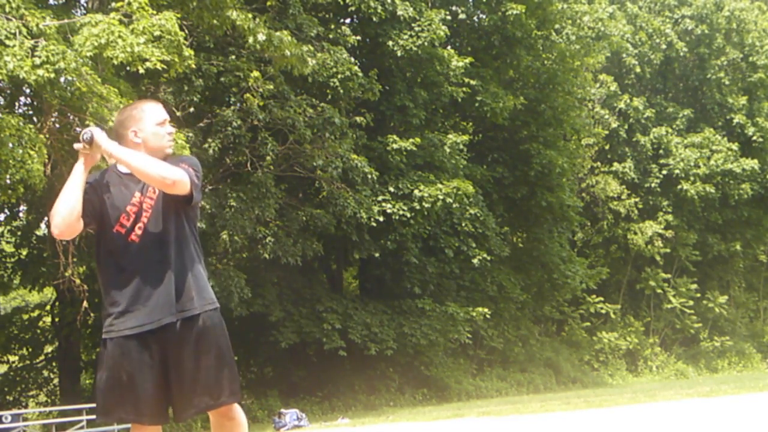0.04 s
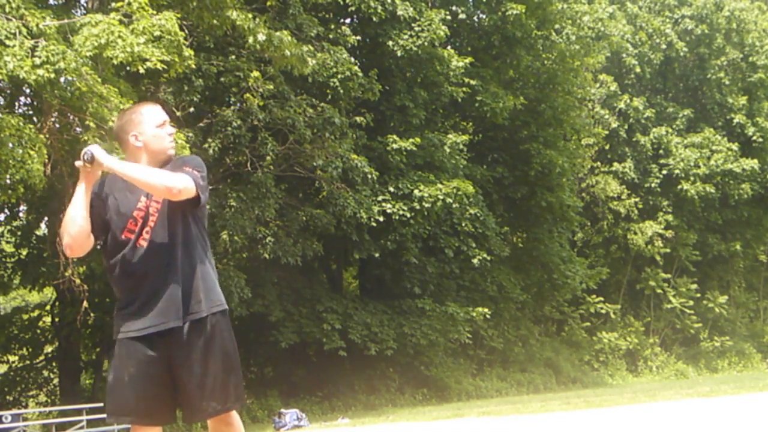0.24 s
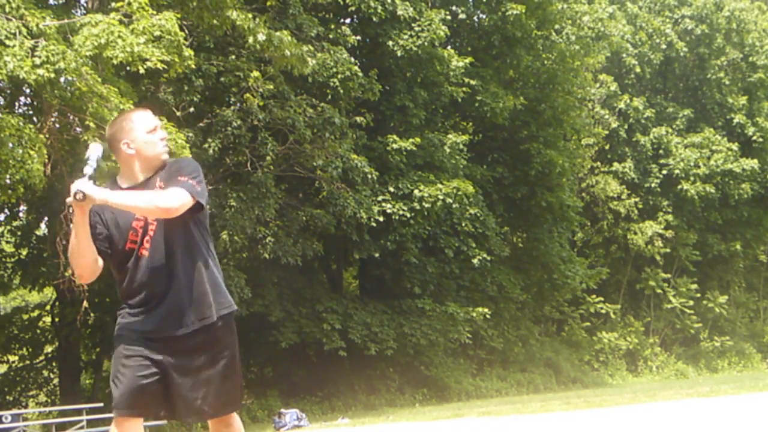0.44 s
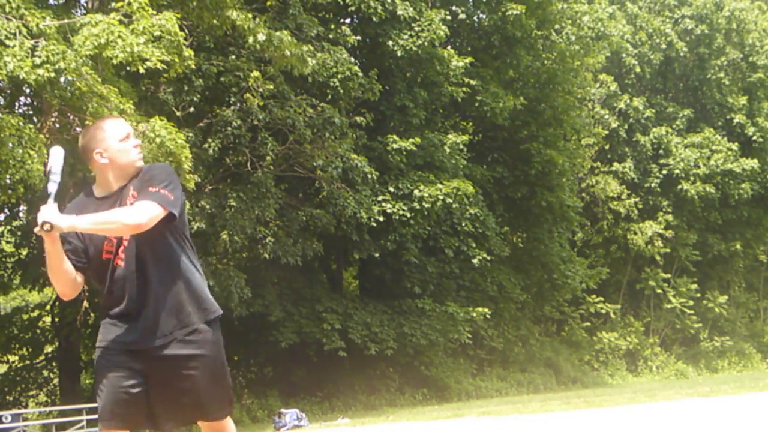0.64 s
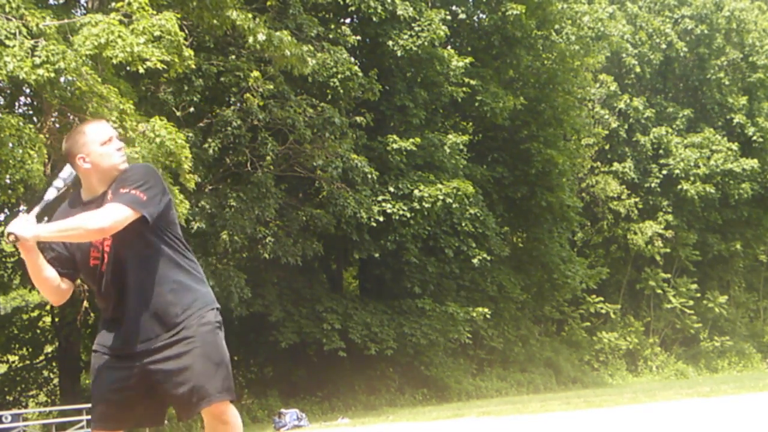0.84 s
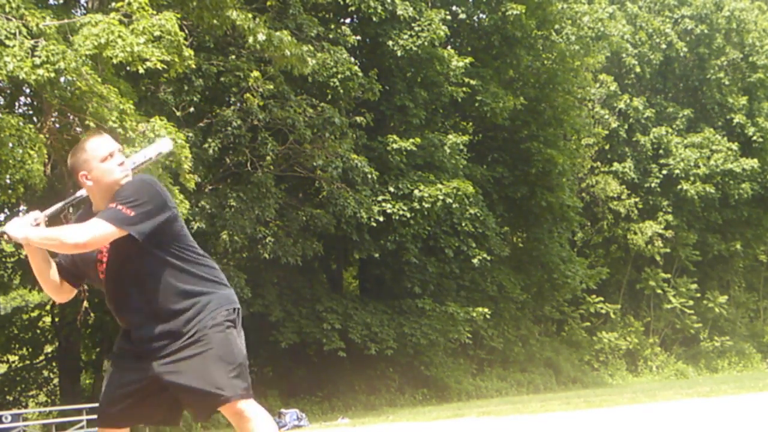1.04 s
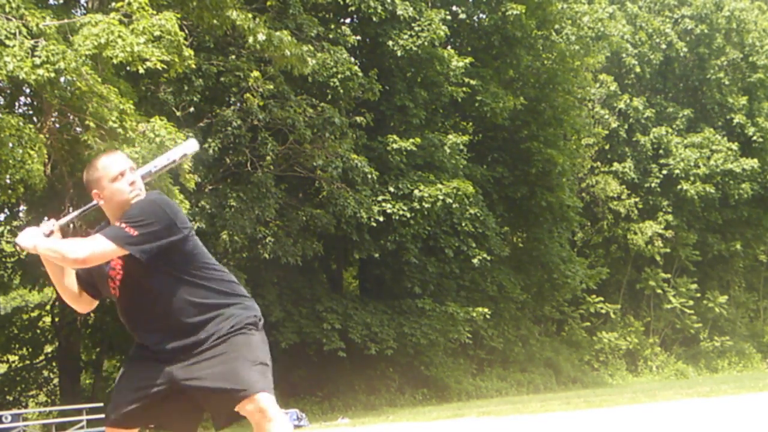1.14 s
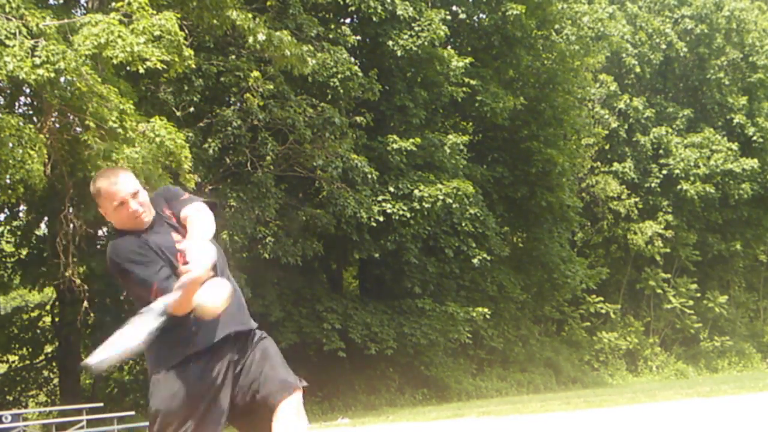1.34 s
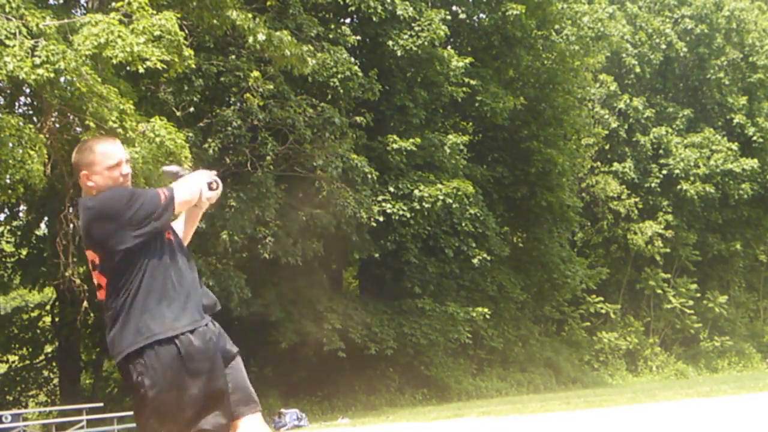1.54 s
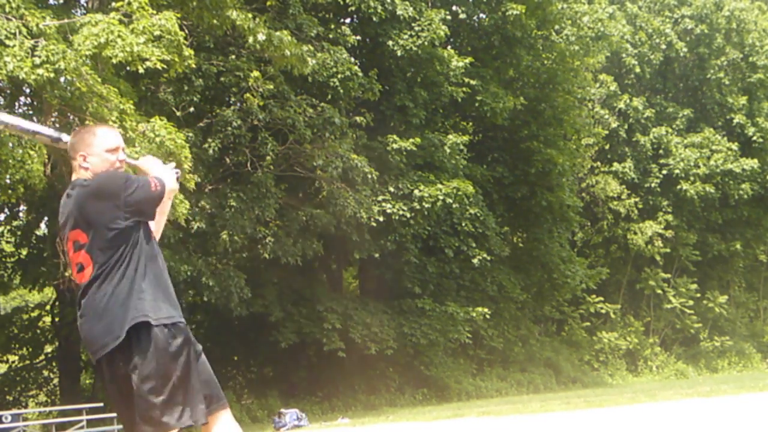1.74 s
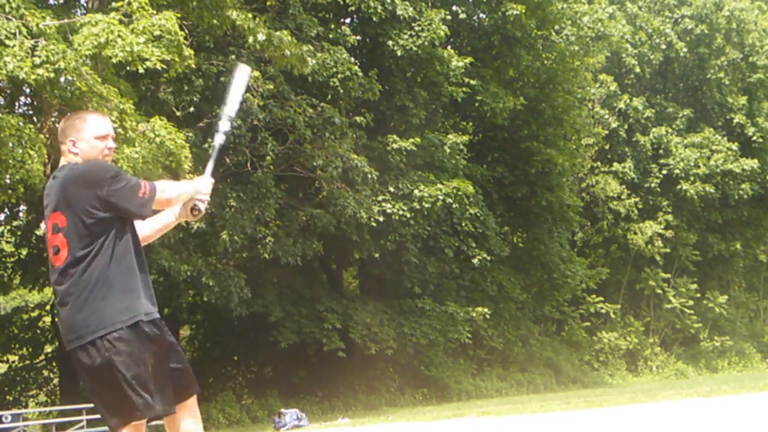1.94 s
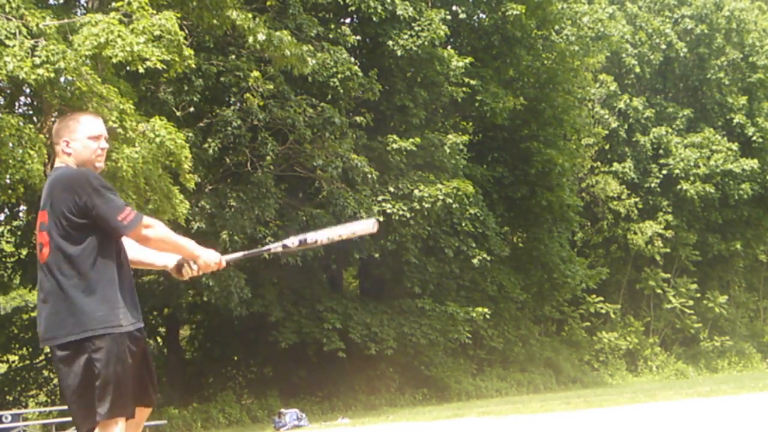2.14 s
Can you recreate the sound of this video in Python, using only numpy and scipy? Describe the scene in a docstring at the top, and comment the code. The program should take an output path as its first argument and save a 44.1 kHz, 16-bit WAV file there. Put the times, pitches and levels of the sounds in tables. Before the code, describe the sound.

A metal bat hitting a ball is the main sound, in a park. Faint birds and distant traffic come first. Clothes rustle softly from about 1.2 seconds, and a quick whoosh leads into the loud, sharp crack at 1.5 seconds. A short ping rings and an echo from the trees fades over half a second. Around 1.9 seconds a bird chirps and two faint, far whistling tones sound.

```python
"""A metal bat strikes a pitched ball on a park field in front of a wall of trees.
At first birds call over distant traffic and a faint hum. Clothes rustle as the batter turns, and the bat
whooshes through the air. At 1.49 s the impact radiates a crack and sets the barrel's modes pinging.
The crack is reflected by the ground, then scattered back by the foliage as a swelling wash.
As that decays, a nearer bird sings again and two far whistling tones sound."""
import sys
import numpy as np
from scipy import signal
from scipy.fft import rfft, irfft
from scipy.io import wavfile

SR = 44100
rng = np.random.default_rng(int(sys.argv[2]) if len(sys.argv) > 2 else 0)


def unload_audio(sound):
    """Save the sound as a 16-bit wav file, at the path given as the first command line argument."""
    columns = np.transpose(np.atleast_2d(sound))
    # keep every value between -1 and 1, then stretch to whole-number steps
    steps = np.round(np.clip(columns, -1, 1) * 32767)
    wavfile.write(sys.argv[1], SR, steps.astype(np.int16))


N = 95873
HIT_S, CUTOFF_HZ = 1.4886, 16000

# spectrum of distant traffic and leaf hiss: f/Hz, relative level/dB
PARK_SPECTRUM = [(25, -29), (60, -5), (140, 2), (280, -3.5), (450, -6.5), (850, -9.5), (1300, -12.5),
                 (2000, -19), (3500, -20), (5500, -26.5), (8500, -27.5), (15500, -33)]
# partials of the steady hum: f/Hz, level/dB
HUM_PARTIALS = [(937, -58.5), (1873, -74.5)]
# far bird calls: centre t/s, half-duration/s, f/Hz, bandwidth/Hz, level/dB
FAR_BIRD_CALLS = [(0.31, .18, 2285, 67, -56), (0.13, 0.1, 3180, 160, -58), (0.24, 0.12, 2660, 790, -55.5),
                  (0.42, 0.087, 4600, 690, -55.5), (0.585, .08, 4700, 450, -60.5),
                  (0.52, 0.14, 3500, 1300, -55), (0.97, 0.05, 7060, 350, -58)]
# a nearer bird's notes: onset t/s, duration/s, start f/Hz, middle f/Hz, end f/Hz, level/dB
NEAR_BIRD_NOTES = [(1.19, .07, 3500, 3670, 4160, -59.5), (1.39, 0.043, 4900, 4400, 4240, -48),
                   (1.849, 0.06, 4350, 3910, 4120, -49), (1.996, 0.043, 3500, 3250, 2780, -52),
                   (2.028, 0.046, 3900, 3830, 4100, -53.5), (2.053, 0.046, 3450, 3430, 4000, -48.5)]
# far whistling tones: onset t/s, duration/s, final f/Hz, upward glide/Hz, level/dB
WHISTLE_TONES = [(1.915, .32, 1312, 44.8, -46.5), (2.067, .2, 1613, 30, -55.5)]
# envelope of the rustle of clothes and shoes: t/s, level/dB
RUSTLE_ENVELOPE = [(1.1, -77), (1.22, -51.5), (1.31, -45.5), (1.39, -42.5), (1.45, -42.5), (1.52, -39),
                   (1.6, -74)]
# spectrum of that rustle: f/Hz, relative level/dB
RUSTLE_SPECTRUM = [(200, -2), (700, 0), (1250, 4), (1800, -10), (4000, -12), (6500, -13), (10000, -13),
                   (16000, -14.5)]
# scuffs of grip and sleeves: centre t/s, half-duration/s, level/dB, f/Hz
SCUFFS = [(0.613, 0.031, -56.5, 11900), (1.005, 0.0013, -43, 13200), (1.348, .006, -47, 3000),
          (1.415, 0.00094, -36, 10500)]
# envelope of the bat's whoosh: t/s, level/dB
WHOOSH_ENVELOPE = [(1.40, -63), (1.44, -42), (1.458, -33.5), (1.472, -25), (1.488, -27), (1.505, -27.5),
                   (1.525, -76)]
# spectrum of that whoosh: f/Hz, relative level/dB
WHOOSH_SPECTRUM = [(40, -26), (120, -6), (330, 3.5), (600, -1.5), (1200, -18), (2500, -9), (5000, -19),
                   (10000, -11), (16000, -20.5)]
# echo of the trees by band: f/Hz, relative level/dB, delay to peak/s, rise/s, T60/s
TREE_ECHO_BANDS = [(202, -13, 0.06, 0.028, 1), (396, 2.5, 0.091, 0.018, 0.67),
                   (664, 10, 0.076, 0.014, 0.57), (920, 6.5, 0.16, 0.053, 0.4), (1255, 0.5, 0.14, 0.11, .6),
                   (1650, 0, 0.11, 0.029, 0.47), (3340, -4, 0.12, 0.081, 0.54), (6300, 1, 0.11, 0.08, 0.55),
                   (9600, 1, 0.11, 0.18, 0.43), (14500, -8, 0.086, 0.14, 0.41)]
# reflections from the ground and things nearby: delay/s, relative level/dB
REFLECTIONS = [(.0053, -6.5), (.013, -17), (.031, -20)]
# the barrel's lasting ping: f/Hz, level/dB, T60/s
PING_MODES = [(1216, -29.5, .58), (1240, -35, .35)]
# the bat's other modes, weaker or briefer: f/Hz, level/dB, T60/s
BAT_MODES = [(625, -38, .5), (810, -22, .015), (1295, -26, .015), (2010, -26, .012), (2266, -48, .6),
             (5889, -45, .6), (6200, -18, .009)]
# spectrum of the crack: f/Hz, relative level/dB
CRACK_SPECTRUM = [(200, -18), (500, 0), (900, 1), (2000, 8.5), (3300, 3), (5000, 3.5), (6300, 11.5),
                  (9000, 3), (11000, 9.5), (14000, 2.5), (16500, -9)]
# notches in the microphone's response: f/Hz, bandwidth/Hz
MIC_NOTCHES = [(7780, 1060), (7930, 1270), (11800, 720)]


def from_db(db):
    """Amplitude ratio of a level in decibels."""
    return 10 ** (np.asarray(db) / 20)


def unit_rms(x):
    """Normalisation to unit mean power."""
    return x / np.sqrt(np.mean(x ** 2) + 1e-20)


def clock():
    """Time t/s of every sample."""
    return np.arange(N) / SR


def bins():
    """Frequency f/Hz of every Fourier bin, at least 1 Hz."""
    return np.maximum(np.fft.rfftfreq(N, 1 / SR), 1)


def envelope(points):
    """Amplitude interpolated through (t/s, level/dB), zero beyond the ends."""
    times, db = np.transpose(points)
    return from_db(np.interp(clock(), times, db, left=-np.inf, right=-np.inf))


def decay(age, t60):
    """Exponential damping from age zero, by 60 dB in t60 seconds."""
    return np.exp(-np.log(1000) * np.maximum(age, 0) / t60)


def swell(age, delay, rise):
    """Gaussian rise that reaches 1 at the delay and holds."""
    return np.exp(-(np.minimum(age - delay, 0) / rise) ** 2 / 2)


def filtered(x, spectrum):
    """Zero-phase filtering by a curve of (f/Hz, level/dB)."""
    hz, db = np.transpose(spectrum)
    return irfft(rfft(x) * from_db(np.interp(np.log(bins()), np.log(hz), db)), N)


def noise(gains):
    """White noise weighted bin by bin, at unit rms."""
    return unit_rms(irfft(rfft(rng.standard_normal(N)) * gains, N))


def coloured(spectrum):
    """White noise shaped by (f/Hz, level/dB), at unit rms."""
    return unit_rms(filtered(rng.standard_normal(N), spectrum))


def band_noise(hz, width):
    """Unit-rms noise in a Gaussian band; centred on 0 Hz it is a random fluctuation."""
    return noise(np.exp(-2 * ((bins() - hz) / width) ** 2))


def noise_burst(centre_s, half_s, hz, width):
    """Band noise under a Gaussian envelope."""
    return band_noise(hz, width) * np.exp(-((clock() - centre_s) / half_s) ** 2)


def throb(pulses_per_s=36, jitter=.6, hz=146, t60=.013):
    """An uneven pulse train excites a damped low resonance, as of a far engine."""
    t = clock()
    cycles = np.cumsum(pulses_per_s * (1 + jitter * band_noise(0, 60))) / SR
    onsets = np.diff(np.floor(np.maximum.accumulate(cycles)), prepend=0)
    pulses = onsets * rng.uniform(.17, 1, N)
    resonance = -np.cos(2 * np.pi * hz * t) * decay(t, t60)
    beats = signal.fftconvolve(pulses, resonance)[:N]
    return from_db(-50.5) * unit_rms(signal.sosfilt(signal.butter(2, 450, fs=SR, output="sos"), beats))


def hum(waver=.41):
    """Steady partials waver by interference with narrow-band noise."""
    return sum(from_db(db) * (np.sqrt(2) * np.sin(2 * np.pi * hz * clock()) + waver * band_noise(hz, 31))
               for hz, db in HUM_PARTIALS)


def traffic_and_leaves():
    """Many distant sources add incoherently to a steady broadband noise."""
    return from_db(-43) * coloured(PARK_SPECTRUM)


def birds(flutter=.35, echo_db=-9, echo_t60=.2):
    """Scattering in the wood blurs far calls to noise and gives nearer gliding notes an echo."""
    t = clock()
    far = sum(from_db(db) * noise_burst(centre, half, hz, width)
              for centre, half, hz, width, db in FAR_BIRD_CALLS)
    notes = 0
    for onset, length, start, middle, end, db in NEAR_BIRD_NOTES:
        progress = np.clip((t - onset) / length, 0, 1)
        hz = np.polyval(np.polyfit([0, .5, 1], [start, middle, end], 2), progress)
        notes += from_db(db) * np.sin(np.pi * progress) * np.sin(2 * np.pi * np.cumsum(hz) / SR)
    notes *= 1 + flutter * band_noise(0, 300)
    leaf_response = rng.standard_normal(N) * decay(t, echo_t60)
    echo = signal.fftconvolve(notes, leaf_response / np.linalg.norm(leaf_response))[:N]
    return far + notes + from_db(echo_db) * echo


def whistles(fade_s=.035, waver=.55):
    """Far tones glide up to pitch; propagation over the field makes them fluctuate."""
    tones = 0
    for onset, length, hz, glide_hz, db in WHISTLE_TONES:
        age = clock() - onset
        phase = 2 * np.pi * np.cumsum(hz - glide_hz * np.exp(-np.maximum(age, 0) / fade_s)) / SR
        gate = np.clip(np.minimum(age, length - age) / fade_s, 0, 1)
        tones += from_db(db) * gate * (np.sin(phase) + waver * band_noise(hz, 105))
    return tones


def tree_echo(echo_db=-19, grain_db=1.4, deep_wood_db=-18, deep_wood_t60=1.46):
    """Scattering by leaves and trunks returns the crack as a diffuse wash whose bass lasts longest."""
    age = clock() - HIT_S
    centres = [band[0] for band in TREE_ECHO_BANDS]
    bass_rolloff = np.minimum(bins() / centres[0], 1) ** 2
    wash = 0
    for (_, db, delay, rise, t60), selector in zip(TREE_ECHO_BANDS, np.eye(len(centres))):
        power_share = np.interp(np.log(bins()), np.log(centres), selector) * bass_rolloff
        band = np.sqrt(power_share.mean()) * noise(np.sqrt(power_share))
        deep_wood = from_db(deep_wood_db) * decay(age - delay, deep_wood_t60)
        tail = np.hypot(decay(age - delay, t60), deep_wood)  # incoherent returns add in power
        wash += from_db(db) * band * swell(age, delay, rise) * tail
    return from_db(echo_db + grain_db * band_noise(0, 320)) * wash * (age > 0)


def batter():
    """Friction noise: clothes and shoes rustle as the body turns, grip and sleeves scuff."""
    scuffs = sum(from_db(db) * noise_burst(centre, half, hz, width=4000)
                 for centre, half, db, hz in SCUFFS)
    return envelope(RUSTLE_ENVELOPE) * coloured(RUSTLE_SPECTRUM) + scuffs


def whoosh():
    """Flow noise swells as the bat sweeps through the air."""
    return envelope(WHOOSH_ENVELOPE) * coloured(WHOOSH_SPECTRUM)


def barrel(age, return_s=.13, return_rise_s=.035, return_gain=.75, waver=.25):
    """Free vibration in damped modes; reflection from the trees renews the ping."""
    modes = sum(from_db(db) * np.sin(2 * np.pi * hz * age) * decay(age, t60) for hz, db, t60 in BAT_MODES)
    for hz, db, t60 in PING_MODES:
        returned = return_gain * swell(age, return_s, return_rise_s) * decay(age - return_s, t60)
        modes += from_db(db) * np.sin(2 * np.pi * hz * age) * np.hypot(decay(age, t60), returned)
    return modes * (1 + waver * band_noise(0, 37))


def air_pulse(age, width_s):
    """A rarefaction followed by a compression: a Gaussian derivative of height 1."""
    return age / width_s * np.exp((1 - (age / width_s) ** 2) / 2)


def contact_click(stages=13, bandwidth_hz=900):
    """Dispersion in the barrel wall, an all-pass chain, spreads the contact over about a millisecond."""
    click = signal.unit_impulse(N, int(HIT_S * SR)) + 1e-18
    radius = np.exp(-np.pi * bandwidth_hz / SR)
    for hz in (np.arange(stages) + rng.random(stages)) * CUTOFF_HZ / stages:
        denominator = [1, -2 * radius * np.cos(2 * np.pi * hz / SR), radius * radius]
        click = signal.lfilter(denominator[::-1], denominator, click)
    return click


def impact(push_delay_s=.0015, reflected_push_share=.27):
    """The collision radiates a crack, a push of air and the barrel's ring; early reflections follow."""
    t = clock()
    age = t - HIT_S
    crack = from_db(9) * filtered(contact_click(), CRACK_SPECTRUM)
    puff = from_db(-7) * air_pulse(age - push_delay_s, width_s=.00039)  # the ball squashes and rebounds
    thud = from_db(-23) * air_pulse(age - push_delay_s, width_s=.00084)  # slower air around the ball
    push = puff + thud
    scatter = from_db(-19) * coloured(CRACK_SPECTRUM) * decay(age, t60=.091)  # off batter and dirt
    reflected = crack + reflected_push_share * push
    reflections = sum(from_db(db) * np.interp(t - delay, t, reflected) for delay, db in REFLECTIONS)
    return crack + push + (barrel(age) + scatter) * (age > 0) + reflections


def scene():
    """Superposition of all sources at the microphone, in one channel."""
    background = throb() + hum() + traffic_and_leaves() + birds() + whistles()
    return (background + tree_echo() + batter() + whoosh() + impact())[None]


def limiter(x, threshold_db=-8.5, attack_s=.0062, release_db_per_s=30):
    """Automatic gain control: a peak over the threshold pulls the gain down, and it creeps back."""
    excess_db = np.maximum(20 * np.log10(np.abs(x) + 1e-9) - threshold_db, 0)
    release_db = release_db_per_s * clock()
    held_db = np.maximum.accumulate(excess_db + release_db, axis=-1) - release_db
    pole = np.exp(-1 / (attack_s * SR))
    return x * from_db(-signal.lfilter([1 - pole], [1, -pole], held_db))


def record(dry, ceiling=.9, notch_leak=.11):
    """Soft saturation and limiting compress the crack; filters notch the treble and cut the top."""
    x = limiter(ceiling * np.tanh(dry / ceiling))
    for hz, width in MIC_NOTCHES:
        notched = signal.lfilter(*signal.iirnotch(hz, hz / width, fs=SR), x)
        x = notch_leak * x + (1 - notch_leak) * notched
    return signal.sosfilt(signal.ellip(12, .1, 80, CUTOFF_HZ - 200, fs=SR, output="sos"), x)


dry = scene()
out = record(dry)
unload_audio(out)
```